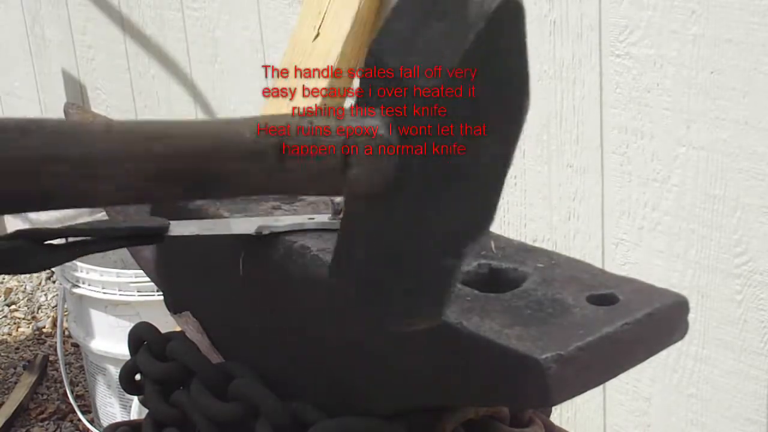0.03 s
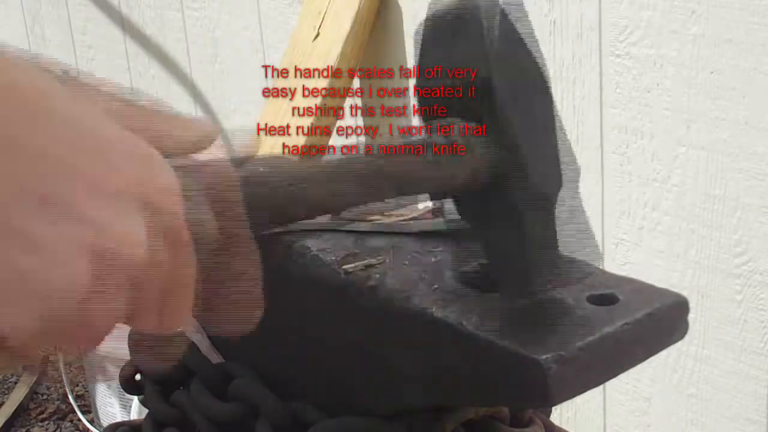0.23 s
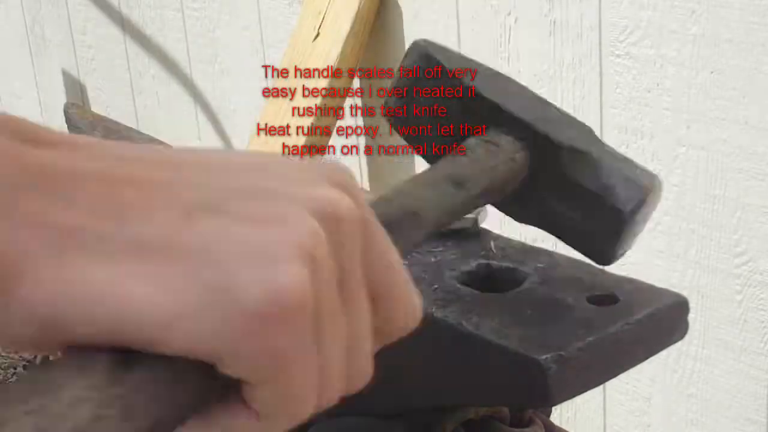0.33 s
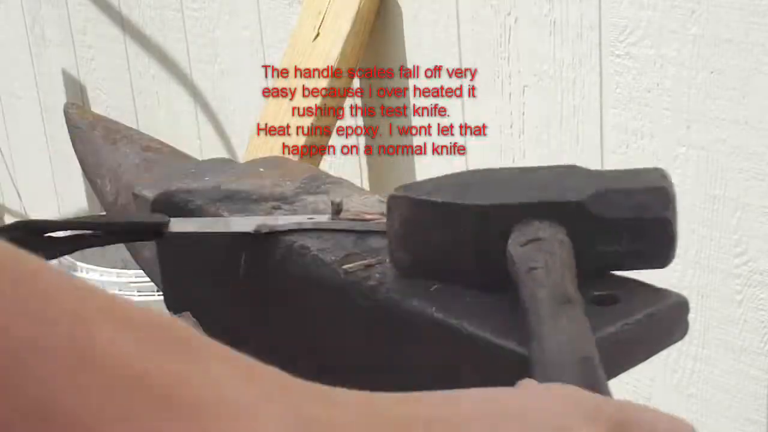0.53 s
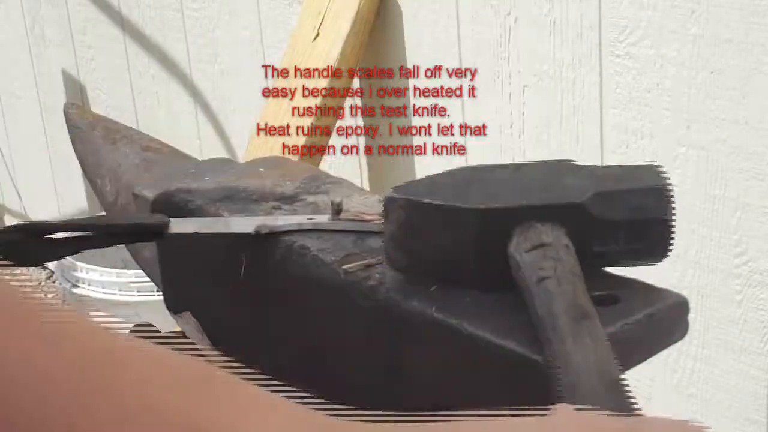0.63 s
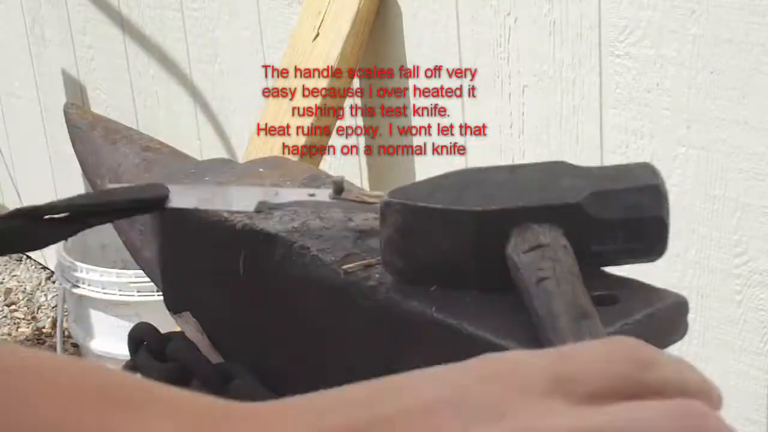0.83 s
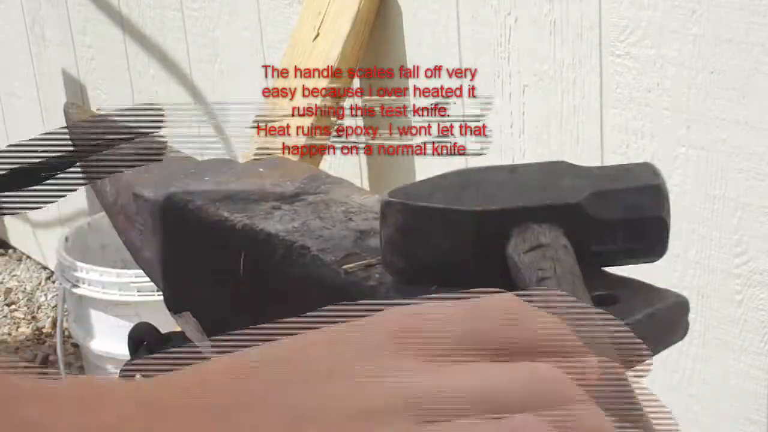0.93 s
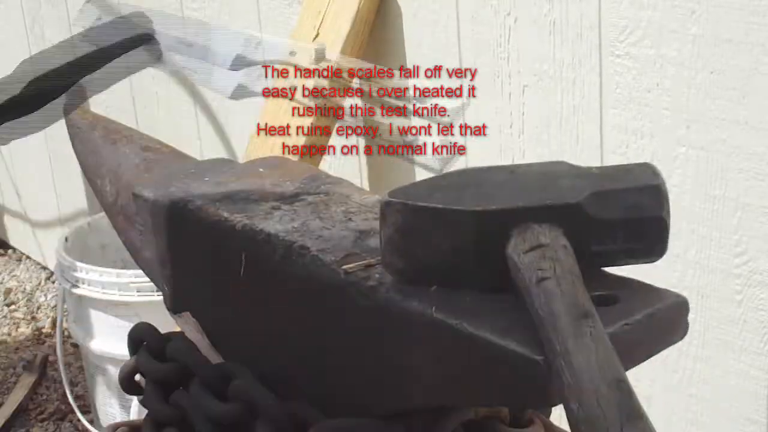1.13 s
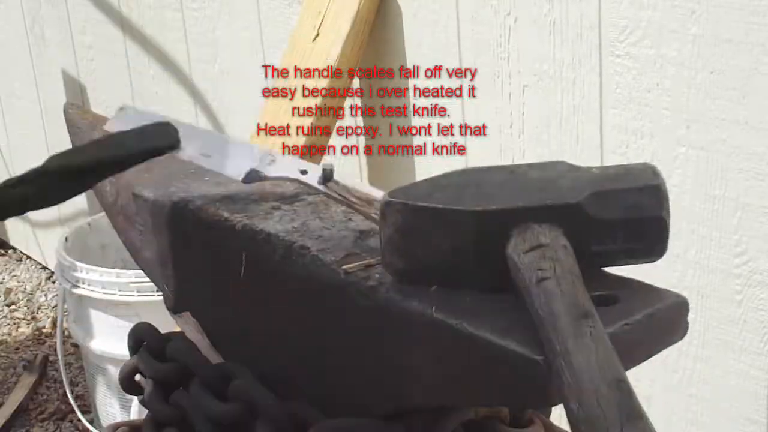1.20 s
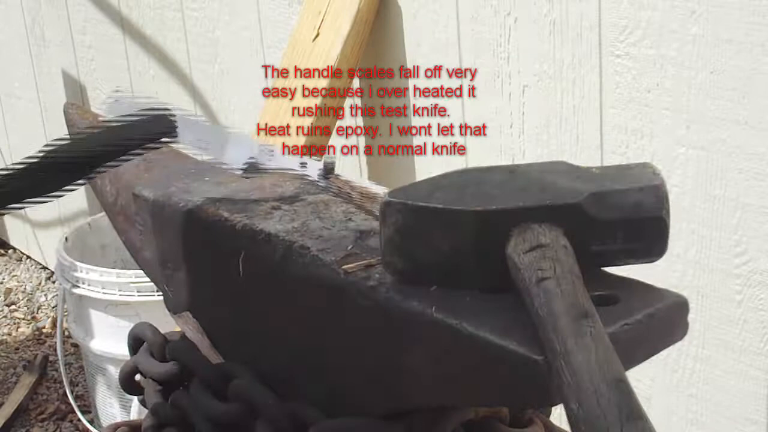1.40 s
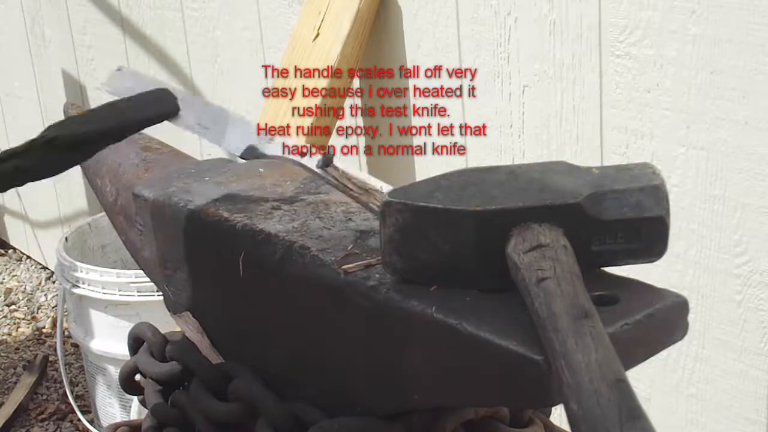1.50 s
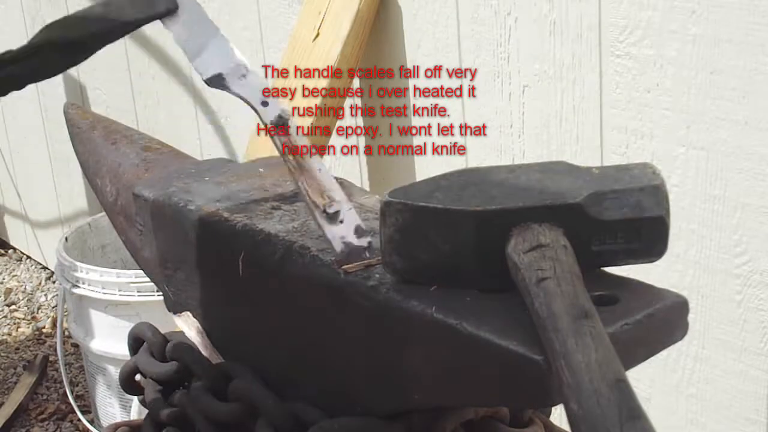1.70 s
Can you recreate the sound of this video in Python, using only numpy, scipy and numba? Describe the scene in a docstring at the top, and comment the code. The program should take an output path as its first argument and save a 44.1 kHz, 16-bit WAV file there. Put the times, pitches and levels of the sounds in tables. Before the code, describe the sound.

Close by outdoors, a heavy hammer taps, clanks twice and settles on a steel anvil. After soft handling scuffs, a knife blade clinks and briefly scrapes against it, with steady hiss and a low hum behind.

```python
"""Outdoors, over a steady hiss, a low rumble and a hum, a heavy hammer is set down on a steel anvil.
Its head taps and clanks twice, each impact exciting the damped modes of head, handle, anvil and stand;
the close microphone overloads on the clanks and its gain control ducks after them. The hammer rocks
to rest on its handle, and faint handling scuffs follow. Last, a knife blade held in tongs clinks,
chatters and briefly scrapes on the anvil."""
import sys
import numpy as np
from scipy import signal
from scipy.fft import rfft, irfft
from scipy.io import wavfile
from numba import njit

SR = 44100
rng = np.random.default_rng(int(sys.argv[2]) if len(sys.argv) > 2 else 0)


def materialize(psi):
    """Save the field psi as 16-bit PCM at rate SR to the path in sys.argv[1].

    A 1-D psi becomes a single channel; in a 2-D psi each row is a channel.
    """
    bounded = np.clip(np.atleast_2d(psi).T, -1, 1)
    quanta = np.round(bounded * 32767).astype(np.int16)
    wavfile.write(sys.argv[1], SR, quanta)


N = 77175


def undb(db):
    """Amplitude ratio of a level in decibels."""
    return 10 ** (np.asarray(db) / 20)


def since(start_s):
    """Seconds elapsed since an onset, zero before it."""
    return np.maximum(np.arange(N) / SR - start_s, 0)


def decay(start_s, t60_s, rise_s=0.00035):
    """Exponential damping: a quick rise, then a fall of 60 dB every t60_s."""
    t = since(start_s)
    return (1 - np.exp(-t / rise_s)) * np.exp(-np.log(1000) * t / t60_s)


def swell(centre_s, half_s):
    """Gaussian envelope with a standard deviation of half_s."""
    return np.exp(-.5 * ((since(0) - centre_s) / half_s) ** 2)


def bins():
    """Frequency axis of the spectrum in Hz, floored at 1."""
    return np.maximum(np.fft.rfftfreq(N, 1 / SR), 1)


def lowpass(cutoff_hz, order=4):
    """Magnitude response of a Butterworth low-pass."""
    return 1 / np.sqrt(1 + (bins() / cutoff_hz) ** (2 * order))


def colour(points):
    """Spectral envelope through (frequency_hz, level_db) points, interpolated in log frequency."""
    hz, db = np.array(points).T
    return undb(np.interp(np.log(bins()), np.log(hz), db))


def resonances(rows):
    """Magnitude response of second-order resonators whose powers add."""
    f = bins()
    powers = (undb(db) ** 2 / (1 + ((f * f - hz * hz) / (f * width)) ** 2) for hz, width, db in rows)
    return np.sqrt(sum(powers))


def noise(response):
    """White noise shaped by a magnitude response and scaled to unit rms."""
    shaped = irfft(rfft(rng.standard_normal(N)) * response, N)
    return shaped / shaped.std()


def ring(start_s, modes):
    """Modal superposition: a struck body sounds as a sum of damped sinusoids."""
    t = since(start_s)
    return sum(undb(db) * decay(start_s, t60) * np.sin(2 * np.pi * hz * t) for hz, db, t60 in modes)


# Spectrum of the background noise: frequency_hz, level_db
AIR_SPECTRUM = [(20, -1), (45, -1.5), (62, -4.5), (78, 13), (95, -3), (150, -6.5), (260, -6), (400, -6),
                (600, -14.5), (850, -11.5), (1050, -3.5), (1210, 3.5), (1390, -7.5), (1580, 0), (1900, -21),
                (2200, -11.5), (2600, -4.5), (3050, -13), (3800, -4.5), (4500, -13), (6200, -21),
                (7000, -26.5), (8500, -23.5), (11000, -32.5), (16000, -45)]
# Slow swell of the rumble and hum: time_s, gain_db
RUMBLE_SWELL = [(0, -7.5), (.18, 3.5), (.45, 4.5), (.68, 2.5), (.85, 2), (1.1, 6.5), (1.3, 1), (1.41, 3),
                (1.75, 3)]

def background():
    """Slow modulation: under a hollow hiss, a rumble and a wavering hum swell and sink together."""
    air = undb(-51) * noise(colour(AIR_SPECTRUM))
    rumble = irfft(rfft(air) * lowpass(110), N)
    hum_hz = 77.9 * (1 + 0.0634 * noise(lowpass(13)))
    hum = undb(-64) * np.sin(2 * np.pi * np.cumsum(hum_hz) / SR)
    waver = undb(-0.44 * noise(lowpass(14, order=2)))
    swell_db = np.interp(since(0), *np.array(RUMBLE_SWELL).T)
    return (air - rumble) * waver + (rumble + hum) * undb(swell_db)


# Spectrum of a thud on the anvil: frequency_hz, level_db
THUD_SPECTRUM = [(30, -15.5), (150, -2.5), (480, -4.5), (900, -1.5), (1500, 7), (2100, 2), (2700, 4.5),
                 (3450, 5), (3950, -47), (7000, -45), (16000, -63)]

def thuds(contacts):
    """Broadband excitation: each contact is a dull burst; the anvil's stand and chain shudder on."""
    impact = sum(undb(db) * decay(start_s, t60_s=0.016) for start_s, db, *_ in contacts)
    shudder = sum(undb(db - 15) * decay(start_s, t60_s=0.08) for start_s, db, *_ in contacts)
    return np.hypot(impact, shudder) * noise(colour(THUD_SPECTRUM))


# Modes of the hammer head: pitch_hz, level_db, t60_s
HEAD_MODES = [(2155, -18, .06), (2467, -14, .06), (2660, -13, .025), (2762, 0, .07), (3070, -15, .04)]

def clang(start_s, choke_s, rise_s=0.0012):
    """Contact damping: the head's ring builds, then is choked as the head beds down on the anvil."""
    t = since(start_s)
    build = 1 - np.exp(-t / rise_s)
    choke = 1 / (1 + (t / choke_s) ** 7)
    return ring(start_s, HEAD_MODES) * build * choke


# Modes of the wooden handle: pitch_hz, level_db, t60_s
HANDLE_MODES = [(534, -22.5, 0.27), (676, -16, 0.091), (1100, 0.5, 0.029), (1360, -33, .09),
                (1898, 2.5, 0.033), (1928, -10, 0.067), (3297, 0.5, 0.04)]
# Modes of the anvil's stand: pitch_hz, level_db, t60_s
STAND_MODES = [(134, -11.5, 0.051), (194, -19, 0.17), (493, -12, 0.05), (551, -7, 0.049), (794, -4, 0.028)]

def knock(start_s, handle_db, stand_db):
    """Free vibration: a contact leaves a woody note in the handle and a hollow one in the stand."""
    return undb(handle_db) * ring(start_s, HANDLE_MODES) + undb(stand_db) * ring(start_s, STAND_MODES)


# Modes of the anvil: pitch_hz, level_db, t60_s
ANVIL_MODES = [(2778, 2, .26), (5405, -4, .2), (7504, -13, .1)]
# Modes of the blade rattling where it lies on the anvil: pitch_hz, level_db, t60_s
RATTLE_MODES = [(4022, 5.5, 0.07), (4040, -9, 0.15), (8550, -6.5, 0.051)]
# Spectrum of the crack of steel on steel: frequency_hz, level_db
CRACK_SPECTRUM = [(1000, -31), (3500, -20), (5000, -10), (6500, -2.5), (8200, 12), (9500, -6), (11500, -22),
                  (13700, 2), (16000, -25)]
# Blows of the head on the anvil:
# start_s, thud_db, head_db, choke_s, handle_db, anvil_db, crack_db, stand_db, rattle_db, shimmer_db
HAMMER_BLOWS = [(0.2453, -12.5, -5.5, 0.014, -25, -48.5, -30, -18, -51, -65),
                (0.3976, 1, 7.5, 0.019, -21.5, -20.5, -40, -11, -16, -56.5),
                (0.4677, -9.5, -2.5, .0095, -20, -28.5, -17, -45, -40, -70)]

def hammer(shimmer_hz=11110, shimmer_t60_s=0.62):
    """Impulse excitation: each blow cracks, thuds and rings head, handle, stand, anvil and blade."""
    sound, crack = thuds(HAMMER_BLOWS), 0
    for (start_s, _, head_db, choke_s, handle_db, anvil_db,
         crack_db, stand_db, rattle_db, shimmer_db) in HAMMER_BLOWS:
        sound += undb(head_db) * clang(start_s, choke_s)
        sound += knock(start_s, handle_db, stand_db)
        sound += undb(anvil_db) * ring(start_s, ANVIL_MODES)
        sound += ring(start_s, [(shimmer_hz, shimmer_db, shimmer_t60_s)])  # the anvil's thin high mode
        sound += undb(rattle_db) * ring(start_s, RATTLE_MODES)
        crack += undb(crack_db) * decay(start_s, t60_s=0.019)
    return sound + crack * noise(colour(CRACK_SPECTRUM))


# Taps of the settling hammer: start_s, thud_db, head_db, handle_db, stand_db
ROCKING_TAPS = [(0.4844, -26, -20.5, -27, -36), (0.5161, -23, -29, -29.5, -41), (0.58, -53, -58, -53, -39),
                (0.595, -38, -49, -44.5, -35), (0.6216, -24.5, -24.5, -31.5, -36.5),
                (0.635, -38.5, -55, -44, -31.5), (0.667, -45, -65, -67, -37)]

def rocking():
    """Weak impacts excite the same modes of head, handle and stand as the hammer rocks to rest."""
    sound = thuds(ROCKING_TAPS)
    for start_s, _, head_db, handle_db, stand_db in ROCKING_TAPS:
        sound += undb(head_db) * clang(start_s, choke_s=0.0061)
        sound += knock(start_s, handle_db, stand_db)
    return sound


# Hollow and thin resonances of the scuffs: centre_hz, width_hz, level_db
HOLLOW_RESONANCES = [(1180, 80, 1.5), (278, 200, -10.5)]
THIN_RESONANCES = [(2430, 210, -7), (3453, 77, 8.5), (4500, 170, -5), (5880, 120, -10)]
# Scuffs close to the microphone: centre_s, half_length_s, hollow_db, thin_db
HANDLING_SCUFFS = [(0.635, 0.0018, -47, -43.5), (0.7, 0.019, -50.5, -57), (0.742, 0.0072, -43, -47),
                   (0.793, 0.0025, -56, -49.5), (0.849, 0.0037, -42, -44.5), (0.875, 0.0029, -44, -49),
                   (0.978, 0.0091, -50, -47), (1.089, 0.0051, -45.5, -55), (1.121, 0.012, -52, -55)]

def handling():
    """Friction noise: soft scuffs swell and fade through two sets of resonances."""
    hollow = sum(undb(db) * swell(centre_s, half_s) for centre_s, half_s, db, _ in HANDLING_SCUFFS)
    thin = sum(undb(db) * swell(centre_s, half_s) for centre_s, half_s, _, db in HANDLING_SCUFFS)
    hollow_noise = noise(resonances(HOLLOW_RESONANCES))
    thin_noise = noise(resonances(THIN_RESONANCES) * lowpass(6100, order=12))
    return hollow * hollow_noise + thin * thin_noise


# Resonances of the blade held in tongs: centre_hz, width_hz, level_db
BLADE_RESONANCES = [(2400, 160, -3.5), (3130, 114, 0.5), (3610, 35, 10), (4183, 106, 1.5), (7200, 820, -5),
                    (8200, 230, 3), (9220, 320, 0), (10300, 900, -27), (13600, 700, -14)]
# Contacts of the blade with the anvil: start_s, ring_db, thud_db
BLADE_CONTACTS = [(1.1417, -10, -13), (1.1429, -10, -44), (1.1608, -21, -55), (1.1773, -29.5, -54),
                  (1.1833, -30.5, -69)]

def knife():
    """Damped resonance: gripped by tongs, the blade rings briefly as it strikes, chatters and scrapes."""
    envelope = undb(-37.5) * swell(centre_s=1.176, half_s=0.0082)  # the scrape
    thud = 0
    for start_s, ring_db, thud_db in BLADE_CONTACTS:
        clink = decay(start_s, t60_s=0.01) + undb(-7) * decay(start_s, t60_s=0.05)
        envelope = np.hypot(envelope, undb(ring_db) * clink)  # incoherent sounds add in power
        thud += undb(thud_db) * decay(start_s, t60_s=0.0086)
    steel = noise(resonances(BLADE_RESONANCES) * lowpass(12000))
    return envelope * steel + thud * noise(colour(THUD_SPECTRUM))


def reflections(direct, level_db=-24.5, damping_hz=4000):
    """Convolution with a short, dull impulse response adds reflections from a wall and the ground."""
    response = noise(1 / (1 + (bins() / damping_hz) ** 2)) * decay(start_s=0.013, t60_s=0.15)
    response /= np.sqrt(np.sum(response ** 2))
    return direct + undb(level_db) * signal.fftconvolve(direct, response)[:N]


def scene():
    """Superposition: all sources add into one signal, the same in both channels."""
    mono = reflections(hammer() + rocking() + knife()) + handling() + background()
    return np.array([mono, mono])


@njit
def follow(rectified, attack_s, release_s):
    """Envelope detection: one-pole smoothing with separate time constants for rise and fall."""
    envelope, level = np.empty(len(rectified)), 0.
    for i in range(len(rectified)):
        lag_s = attack_s if rectified[i] > level else release_s
        level += (rectified[i] - level) / (lag_s * SR)
        envelope[i] = level
    return envelope


def record(dry, threshold_db=-34.5, ratio=1.269, clip_db=-10.3, left_db=-8, hiss_db=-67):
    """Compression and saturation: loud hits duck the gain and clip; hiss is added and the top is cut."""
    level = follow(np.abs(dry[1]), attack_s=0.0029, release_s=0.051)
    gain = np.maximum(level / undb(threshold_db), 1) ** (1 / ratio - 1)
    drive = dry * gain / undb(clip_db)
    clipped = undb(clip_db) * drive / (1 + drive ** 6) ** (1 / 6)
    hiss = undb(hiss_db) * np.array([noise(colour(AIR_SPECTRUM)) for _ in range(2)])
    stereo = clipped * undb([[left_db], [0]]) + hiss
    passband = lowpass(13000, order=2) * lowpass(15900, order=70)  # microphone roll-off, then a steep cut
    return irfft(rfft(stereo) * passband, N)


dry = scene()
out = record(dry)
materialize(out)
```